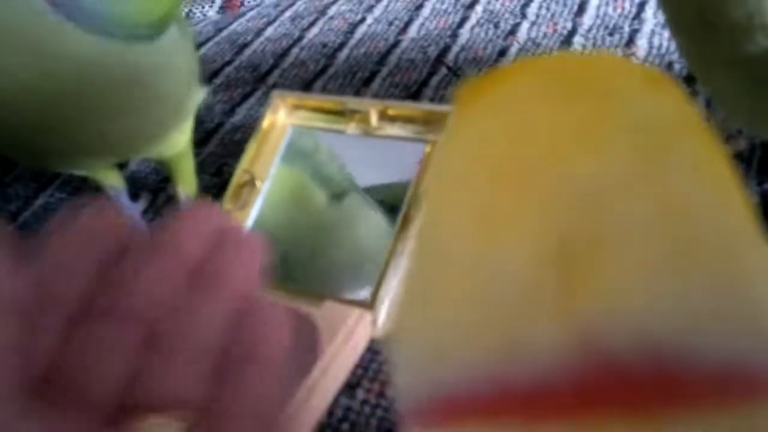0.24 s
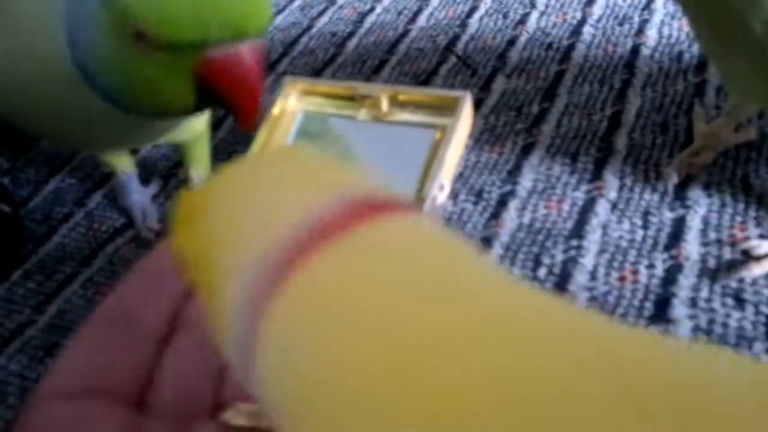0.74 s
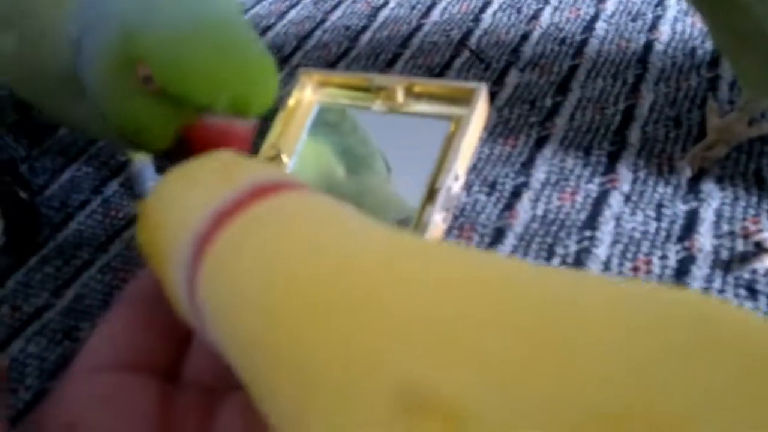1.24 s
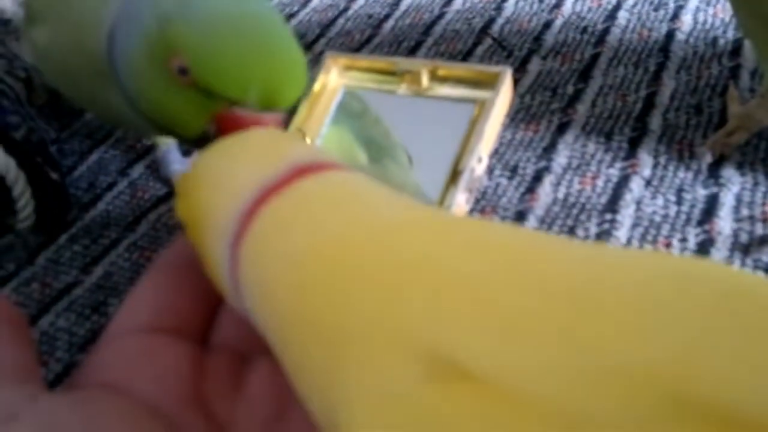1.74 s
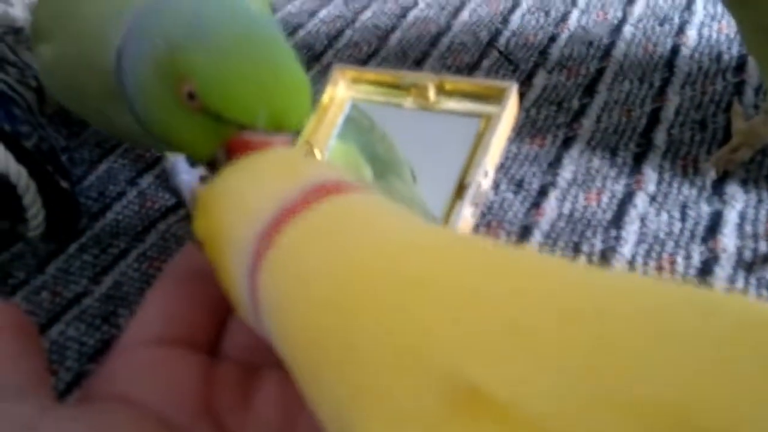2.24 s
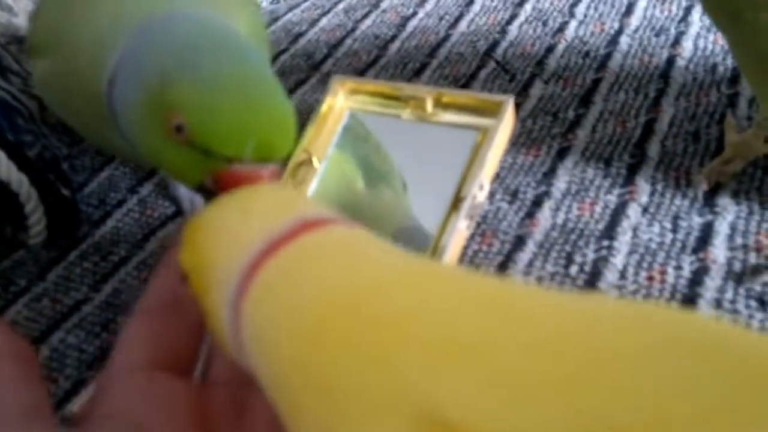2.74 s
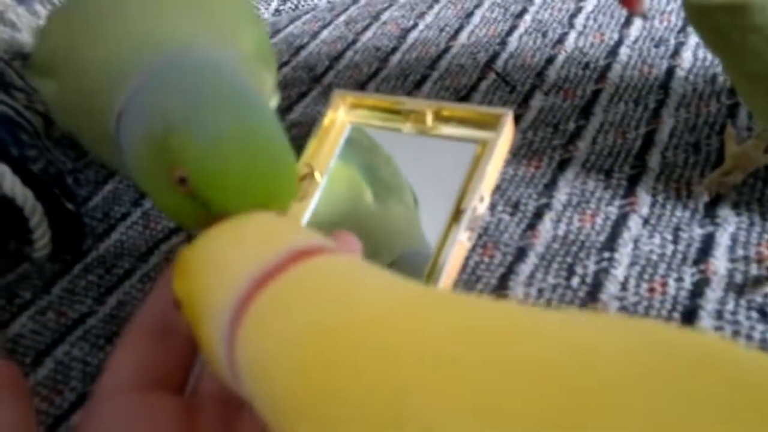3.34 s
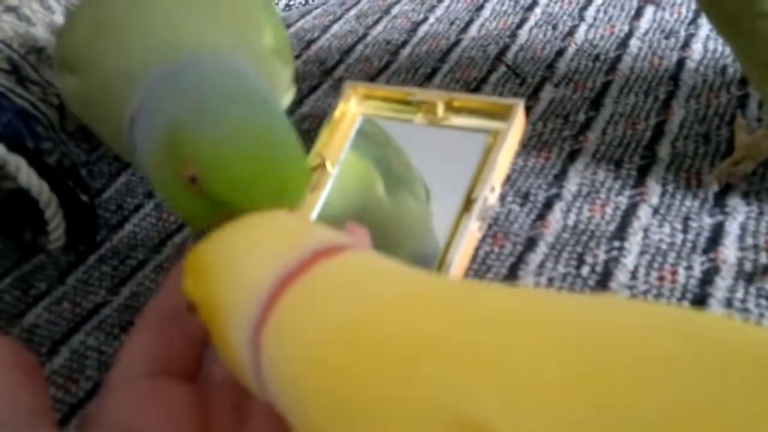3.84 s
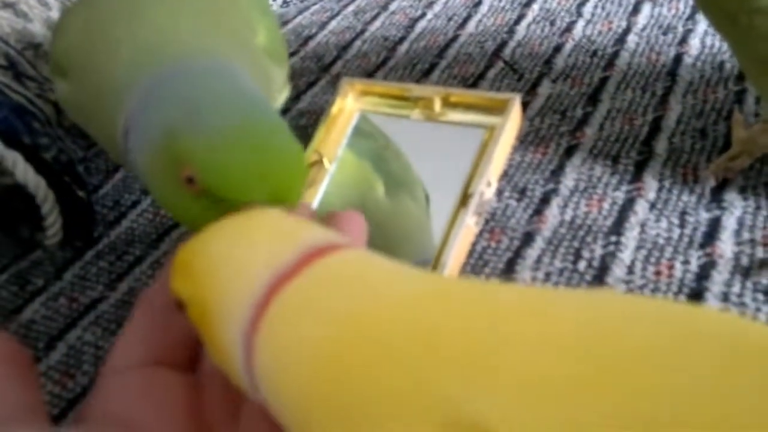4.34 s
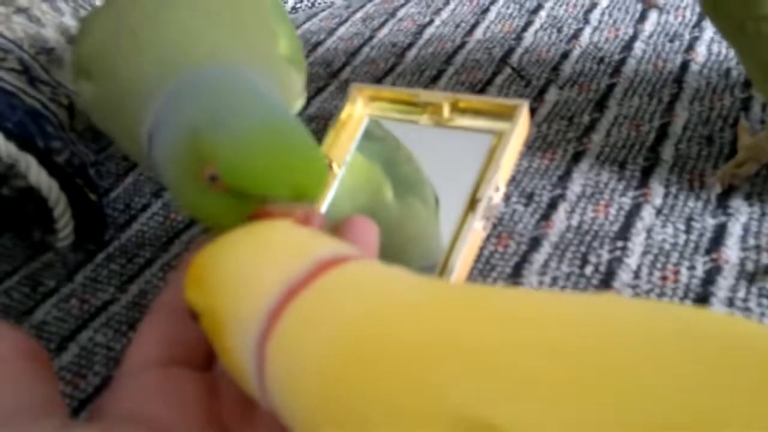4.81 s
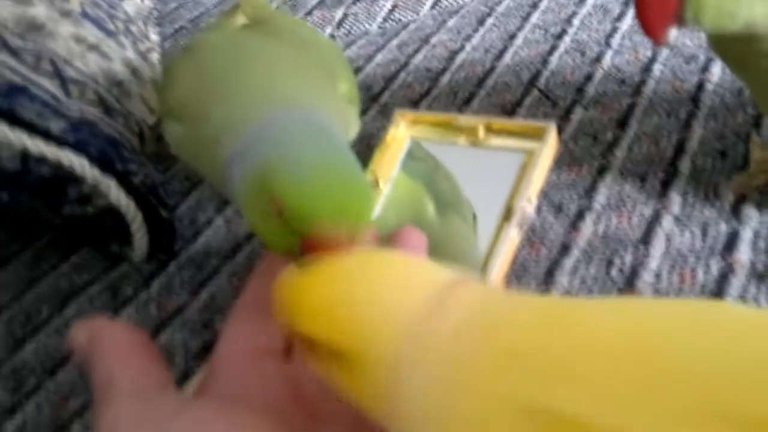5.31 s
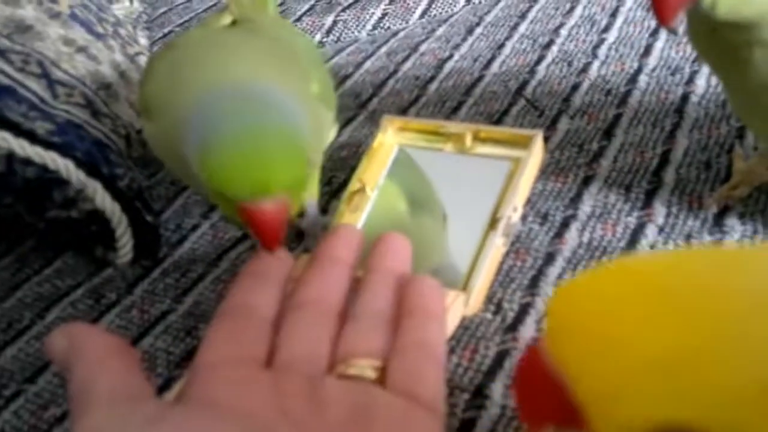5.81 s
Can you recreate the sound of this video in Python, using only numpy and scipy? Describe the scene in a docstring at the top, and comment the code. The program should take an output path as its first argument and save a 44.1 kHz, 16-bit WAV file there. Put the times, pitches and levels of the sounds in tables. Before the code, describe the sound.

Close stereo pickup of a ring-necked parrot on carpet. After about a second of near quiet, barely audible clucks quickly grow into strong, dry, evenly spaced chirps, each one to three tight strokes of rasp and rough whistle. Tiny beak scrapes fall between them. The small furnished room answers with a brief ring. The calls slow slightly, lose their whistle and fade over low rumble and hiss.

```python
"""A ring-necked parrot, close by on a carpet, gives a run of short clucking chirps that swell and fade,
most of them about four a second. Each is a dry rasp: noise spurts ringing chest, windpipe, throat and beak.
One to three rough whistled strokes, noisy sweeping sines, climb in pitch; the last chirps are nearly all rasp.
Beaks tick softly in between (short noise scrapes), with a few chuffs (resonant noise) and faint thin peeps
(wavering sines), one of them a tiny soft chirp. A small room rings briefly over a quiet low rumble and hiss."""
import sys
import numpy as np
from scipy import signal
from scipy.fft import rfft, irfft, next_fast_len
from scipy.io import wavfile

SR = 44100
rng = np.random.default_rng(int(sys.argv[2]) if len(sys.argv) > 2 else 0)


def materialize(psi):
    """Save the field psi as 16-bit PCM at rate SR to the path in sys.argv[1].

    A 1-D psi becomes a single channel; in a 2-D psi each row is a channel.
    """
    bounded = np.clip(np.atleast_2d(psi).T, -1, 1)
    quanta = np.round(bounded * 32767).astype(np.int16)
    wavfile.write(sys.argv[1], SR, quanta)


N = 267334
GRAIN = np.arange(-4096, 4096) / SR  # time axis of one short sound [s], zero at its centre

# All source levels below are taken before the final mix.
LOUD_DB = -29  # rasp level of a chirp at full effort
ATTACK_S, RISE_SHARE = 0.0027, 0.69  # the rasp swells over this time, plus this share of the lead
THROAT_BASE_HZ, THROAT_HZ_PER_DB = 1477, 27  # the throat resonance sinks as the chest takes over
# the chest resonance sinks with effort and as the chest takes over
CHEST_BASE_HZ, CHEST_HZ_PER_DB, CHEST_HZ_PER_CHEST_DB = 657, 12, 5.5
# opening stroke: its rasp eases in ahead of its whistle; its hiss is stronger as the beak opens
OPEN_RISE_S, OPEN_S, OPEN_RASP_DB, OPEN_HISS_DB = 0.0063, 0.0036, -4.5, 9.5
# the tongue snaps as hard as the beak rings, and is heard even through a shut beak
SNAP_DB, SNAP_S, SNAP_LEAST_DB = -2.5, 0.0012, -5
RASP_PAN_DB = -4  # left minus right

# The chirps, one a row: (time of last stroke [s], number of strokes, lead from opening to last stroke [s],
# fall [s], rasp level [dB], chest [dB re rasp], beak [dB re rasp], hiss [dB re rasp],
# whistle level [dB], whistle pitch [Hz], whistle left minus right [dB])
CHIRP_STROKES = [(0.833, "single", 0.0083, 0.0021, -68.5, 17, -20, -27, -49, 2494, 6),
                 (1.174, "single", 0.0045, 0.0077, -61.5, 16, -22, -8, -45.5, 2750, 10.5),
                 (1.360, "single", 0.0092, 0.0022, -48.5, 13, -8, -5, -17.5, 2620, 0.5),
                 (1.624, "double", .024, 0.014, -32, -4, -22, -26, -22, 3232, -2),
                 (1.850, "double", .028, 0.0059, -27.5, -1, -27.5, -29, -12, 2885, -1.5),
                 (2.073, "triple", 0.021, 0.0095, -27, -2, -3, -17, -10.5, 3044, 0.5),
                 (2.315, "triple", 0.025, 0.0067, -27.5, 1.5, -2, -20, -10, 3128, -1),
                 (2.562, "double", 0.014, 0.0064, -27.5, -3, -1, -18.5, -11.5, 2759, 0.5),
                 (2.803, "double", 0.015, 0.0069, -29.5, 6, 3.5, -17, -11.5, 2792, -1),
                 (3.047, "single", 0.013, .011, -27, -6, -3.5, -27, -18, 2670, -1),
                 (3.292, "double", 0.01, 0.007, -26, -11.5, -11.5, -29, -24, 2670, -8),
                 (3.556, "double", .016, .012, -25.5, -5.5, -6.5, -27, -19, 2701, -7),
                 (3.801, "single", 0.018, .016, -28, -5, -3, -33, -14, 2848, -5.5),
                 (4.072, "triple", .016, 0.0084, -27, -10.5, 2.5, -39, -19.5, 2750, -4.5),
                 (4.332, "triple", .018, 0.0071, -27.5, 1.5, 8, -19.5, -16, 3042, -3.5),
                 (4.602, "single", 0.00086, 0.014, -30, -1, 4, -17, -38.5, 3000, 4),
                 (4.901, "single", 0.0016, 0.0078, -25, -2.5, -13, -26.5, -38, 2520, 11),
                 (5.177, "single", 0.0052, 0.012, -39.5, 3, -1.5, -16, -73, 2914, 0),
                 (5.447, "single", .005, 0.01, -51.5, 8.5, 0.5, -9, -68, 2701, 2)]


def chirp_rasps():
    """Source-filter principle: pushes of turbulent air excite body resonances, ending in a tongue snap."""
    out = np.zeros((2, N))
    for s, strokes, lead, fall, db, chest_db, beak_db, hiss_db, *_ in CHIRP_STROKES:
        throat_hz = THROAT_BASE_HZ - THROAT_HZ_PER_DB * chest_db
        effort_db = db - LOUD_DB
        chest_hz = CHEST_BASE_HZ - CHEST_HZ_PER_DB * effort_db - CHEST_HZ_PER_CHEST_DB * chest_db
        pushes = [(s, swell(ATTACK_S + RISE_SHARE * lead, fall), db, hiss_db)]
        if strokes != "single":
            opening = swell(OPEN_RISE_S, OPEN_S)
            pushes.append((s - lead, opening, db + OPEN_RASP_DB, hiss_db + OPEN_HISS_DB))
        for at, push, level_db, edge_db in pushes:
            pair = [rasp(push, level_db, throat_hz, chest_hz, chest_db, beak_db, edge_db,
                         syrinx_db=-2.5, grit_db=6.0, edge=1.8) for _ in range(2)]
            add(out, at, two_ears(*pair, RASP_PAN_DB))
        snap_db = db + max(beak_db, SNAP_LEAST_DB) + SNAP_DB
        snap = rasp(swell(1.3 * SNAP_S, SNAP_S), snap_db, 1500, 700, chest_db=-11, beak_db=-12.5,
                    hiss_db=-25.5, syrinx_db=-6.5, grit_db=5.5, edge=.5)
        add(out, s, snap)
    return out * undb(-2.5)


RASP_TOP_HZ = 7660  # the rasp dies away above this
# The syrinx rasps over a broad band: (centre [Hz], width of one filter pass [Hz])
SYRINX_BAND = (2900, 1700)
# The beak rings above it: (centre [Hz], width of one filter pass [Hz])
BEAK_BAND = (4510, 1600)
# Thin hiss at the beak's edge: (low limit [Hz], high limit [Hz])
HISS_BAND = (8500, 11900)


def rasp(push, db, throat_hz, chest_hz, chest_db, beak_db, hiss_db, syrinx_db, grit_db, edge,
         throat_width_hz=650, chest_width_hz=330):
    """Parallel formants: uneven air spurts excite chest, windpipe, throat, syrinx and beak side by side."""
    grit = undb(grit_db * wobble(450))
    air = push * grit * rng.standard_normal((7, len(GRAIN)))
    hard = push ** edge  # weights the treble towards the hardest part of the push
    parts = [
        (resonate(air[0], chest_hz, chest_width_hz), chest_db - 1),
        (resonate(air[1], .72 * throat_hz, 400), -5),  # the windpipe rings below the throat
        (resonate(air[2], 1.047 * throat_hz, throat_width_hz), -1),
        (resonate(air[3], *SYRINX_BAND), syrinx_db),
        (resonate(air[4] * hard, *BEAK_BAND), beak_db),
        (resonate(air[5], 250, 210), chest_db - 18.0),  # the soft puff underneath
    ]
    body = sum(dose(sound, push, db + rel_db) for sound, rel_db in parts)
    body = signal.sosfilt(signal.butter(3, RASP_TOP_HZ, fs=SR, output="sos"), body)
    hiss = signal.sosfilt(signal.butter(2, HISS_BAND, "band", fs=SR, output="sos"), air[6] * hard)
    return body + dose(hiss, push, db + hiss_db)


def chirp_whistles(second_ratio=1.24, second_db=-12, lag_spread_s=.00005):
    """Two-voice principle: both sides of the syrinx swing at once, the second higher, and beat together."""
    out = np.zeros((2, N))
    for s, half, db, hz, pan_db in bursts():
        push = swell(half, half)
        first = whistle(push, db, hz, jitter=0.073, flutter_db=4.5, glide_hz_per_s=11000)
        second = whistle(push, db + second_db, hz * second_ratio,
                         jitter=.06, flutter_db=-0.5, glide_hz_per_s=8300)
        left, right = place(first, pan_db) + place(second, 4.5)
        # a small chance lag at the right ear, different for each stroke, widens the whistle
        lag = int(round(lag_spread_s * SR * rng.standard_normal()))
        add(out, s, np.array([left, np.roll(right, lag)]))
    return out


WHISTLE_SHARE = 0.56  # half length of the last whistle against the fall of the rasp
# the opening whistle starts alike in all chirps that have one, then weakens as the run goes on
OPEN_DB, OPEN_HZ, OPEN_PAN_DB = -17, 2520, 6  # the pan is added to that of the last stroke
OPEN_FADE_FROM_S, OPEN_FADE_DB_PER_S = 2.5, 1.5
MIDDLE_S = 0.0037  # half length of a middle stroke


def bursts():
    """Pitch stepping: evenly spaced strokes, as (time [s], half length [s], level [dB], pitch [Hz], pan [dB])."""
    for s, strokes, lead, fall, *_, db, hz, pan_db in CHIRP_STROKES:
        yield s, WHISTLE_SHARE * fall, db, hz, pan_db
        if strokes != "single":
            open_db = OPEN_DB - OPEN_FADE_DB_PER_S * max(s - OPEN_FADE_FROM_S, 0)
            yield s - lead, OPEN_S, open_db, OPEN_HZ, pan_db + OPEN_PAN_DB
        if strokes == "triple":
            yield s - lead / 2, MIDDLE_S, db, (OPEN_HZ + hz) / 2, pan_db


def whistle(push, db, hz, jitter, flutter_db, glide_hz_per_s):
    """Frequency and amplitude modulation: a membrane swings with unsteady pitch and strength."""
    pitch = hz * (1 + jitter * wobble(600)) + glide_hz_per_s * GRAIN
    tone = np.sin(2 * np.pi * np.cumsum(pitch) / SR)
    strength = undb(flutter_db * wobble(290))
    return dose(push * strength * tone, push, db)


TICK_CHEST_DB = -2.5
TICK_HISS_DB, TICK_HISS_PER_BEAK_DB = -10, 0.97  # a ringing beak also hisses more
# Beak ticks and nibbles: (time [s], half length before shaping [s], level [dB], beak [dB re level])
BEAK_TICKS = [(0.14, 0.0065, -46.5, -7.5), (1.428, 0.0096, -59.5, -22), (1.562, 0.0032, -42, -24),
              (2.917, 0.015, -47.5, -5.5), (3.179, .011, -46, -8), (3.201, 0.011, -44, -11),
              (3.322, 0.018, -51, 8), (3.45, 0.014, -52.5, -9), (3.482, 0.0098, -41.5, -8),
              (3.745, 0.024, -46, -11), (3.987, 0.03, -49.5, 1.5), (4.01, 0.0095, -48.5, 1.5),
              (4.252, 0.0052, -52.5, -8.5), (4.482, 0.009, -53, -9), (5.499, .008, -68, 5),
              (5.822, 0.016, -49, 5.5)]


def ticks():
    """Friction noise: short gritty scrapes of the beaks excite the same resonator bank."""
    out = np.zeros(N)
    for s, half, db, beak_db in BEAK_TICKS:
        hiss_db = TICK_HISS_DB + TICK_HISS_PER_BEAK_DB * beak_db
        push = swell(0.48 * half, 0.85 * half)
        scrape = rasp(push, db, 2100, 800, TICK_CHEST_DB, beak_db, hiss_db,
                      syrinx_db=-3.5, grit_db=4.0, edge=.4)
        add(out, s, scrape)
    return out


CHUFF_WIDTH_HZ = 750  # of one filter pass
# Chuffs of resonant noise; the strongest, at 4.363 s, is probably the room answering a chirp:
# (time [s], half length [s], level [dB], centre [Hz])
CHUFF_EVENTS = [(0.135, 0.021, -54, 1820), (0.279, 0.013, -53, 1890), (0.664, 0.014, -51, 1910),
                (1.502, 0.018, -65.5, 1560), (1.792, 0.009, -51, 1353), (4.363, 0.016, -35.5, 2000),
                (5.766, 0.017, -49.5, 1340)]
# Faint thin peeps, the one at 1.027 s a tiny soft chirp:
# (time [s], half length [s], level before harmonic weights [dB], pitch [Hz])
PEEP_EVENTS = [(0.006, 0.0082, -36, 2611), (0.1, 0.019, -61, 2540), (1.027, .003, -65.5, 2450)]


def chuffs_and_peeps():
    """Noise and tone excitation: chuffs are resonant air noise, peeps a sine with a weak octave."""
    out = np.zeros(N)
    for s, half, db, hz in CHUFF_EVENTS:
        push = swell(half, half)
        air = push * rng.standard_normal(len(GRAIN))
        add(out, s, dose(resonate(air, hz, CHUFF_WIDTH_HZ), push, db))
    for s, half, db, hz in PEEP_EVENTS:
        for multiple, rel_db in ((1, -0.5), (2, -9)):
            peep = whistle(swell(half, half), db + rel_db, multiple * hz,
                           jitter=0.026, flutter_db=1.0, glide_hz_per_s=-900)
            add(out, s, peep)
    return out


# Shading of the right ear from the beak: (frequency [Hz], gain of the right ear's rasps and ticks [dB])
EAR_SHADE = [(200, -8.5), (700, -6.5), (1200, 0.5), (1800, -1), (3000, 2), (4000, 0), (5000, -16),
             (8000, -37), (14000, -16.5)]


def shade(sound):
    """Acoustic shadowing: the ear turned from the beak receives a differently coloured sound."""
    left, right = sound
    return np.array([left, colour(right, EAR_SHADE)])


# Near echoes off mirror, hand and carpet: (delay at left ear [s], delay at right ear [s], gain [dB])
NEAR_SURFACES = [(.0014, .0019, -18), (.0029, .0037, -17.5), (.0054, .0046, -16)]


def near_echoes(birds):
    """Comb filtering: delayed copies from small near surfaces colour each ear differently."""
    out = birds.copy()
    for left_s, right_s, db in NEAR_SURFACES:
        for ear, lag_s in enumerate((left_s, right_s)):
            lag = int(lag_s * SR)
            out[ear, lag:] += undb(db) * birds[ear, :N - lag]
    return out


# Throw of the sound into the room as the bird turns its head: (time [s], body gain [dB], bright gain [dB])
HEAD_TURN = [(1.36, -3.5, -4), (1.6, -1.5, -3.5), (1.9, -5, 6.5), (2.7, -2, 0.5), (3.1, -3, 8),
             (3.8, 1, -1), (4.35, -6, -7), (4.6, -4.5, 2), (4.9, -9, -4), (5.201, -11.5, -16)]


def thrown(x):
    """Directivity: the body and the bright part sent to the room each vary with the turn of the head."""
    s, body_db, bright_db = np.transpose(HEAD_TURN)
    t = np.arange(N) / SR
    body = signal.sosfiltfilt(signal.butter(4, 2550, fs=SR, output="sos"), x)
    bright = x - body
    return body * undb(np.interp(t, s, body_db)) + bright * undb(np.interp(t, s, bright_db))


# Colour of the room's ring: (frequency [Hz], gain [dB])
ROOM_COLOUR = [(150, -27), (600, -12), (1100, -1.5), (1800, 6), (2300, 8), (2900, -11.5), (3800, -6),
               (5000, -8), (6500, -22), (12000, -17)]


def sent_to_room(rasps, whistles):
    """Radiation: whistles beam forward while the rasp spreads more freely, and the room colours both."""
    radiated = (undb(0.5) * rasps + undb(-3) * whistles).mean(axis=0)
    return colour(thrown(radiated), ROOM_COLOUR)


def reflections(x, buildup_s, t60_s):
    """Diffuse reverberation: dense echoes build up and decay exponentially, different at each ear."""
    t = np.arange(SR * 3 // 4) / SR
    decay = np.exp(-np.log(1000) * t / t60_s)
    buildup = 1 - np.exp(-(t / buildup_s) ** 2)
    tail = rng.standard_normal((2, len(t))) * decay * buildup
    tail /= np.sqrt(np.sum(tail ** 2, axis=1, keepdims=True))
    return signal.fftconvolve(x[None], tail, axes=1)[:, :N]


RUMBLE_SWAY_DB, RUMBLE_SWAY_HZ = 4, 35
# Spectral shape of the quiet background: (frequency [Hz], relative density [dB per Hz])
FLOOR_SHAPE = [(20, -10), (70, -5), (110, -15.5), (200, -18), (330, -21.5), (640, -23), (1000, -25.5),
               (1900, -28.5), (3500, -34), (9500, -37.5), (12000, -46), (15500, -52.5)]
# Low rumble: (time [s], level before the sway [dB])
RUMBLE_LEVEL = [(0, -59.5), (.9, -69.5), (1.8, -67.5), (2.7, -72.5), (3.8, -64.5), (4.1, -77), (4.8, -65),
                (6.06, -69.5)]


def background():
    """Filtered noise: partly shared by both ears, split into a lumpy rumble and a faint smooth hiss."""
    noise = colour(rng.standard_normal((2, N)) + 0.22 * rng.standard_normal(N), FLOOR_SHAPE)
    low = signal.sosfiltfilt(signal.butter(2, 260, fs=SR, output="sos"), noise)
    rumble_db = np.interp(np.arange(N) / SR, *np.transpose(RUMBLE_LEVEL))
    rumble_db = rumble_db + RUMBLE_SWAY_DB * drift(RUMBLE_SWAY_HZ)
    hiss_db = -73.5 + 1.0 * drift(2.1)
    return unit(low) * undb(rumble_db) + unit(noise - low) * undb(hiss_db)


def drift(rate_hz):
    """Slow random modulation: chance values of spread near 1 joined by straight lines."""
    t = np.arange(N) / SR
    return np.interp(t * rate_hz, np.arange(400), rng.standard_normal(400))


def wobble(rate_hz):
    """Band-limited modulation: smooth chance of spread 1 over the length of one grain."""
    lowpass = signal.butter(2, rate_hz, fs=SR, output="sos")
    return unit(signal.sosfilt(lowpass, rng.standard_normal(len(GRAIN))))


def swell(rise, fall):
    """Amplitude envelope: a push of air opens abruptly and dies away as a bell curve."""
    opening = np.abs(GRAIN / rise) ** 3
    closing = (GRAIN / fall) ** 2
    return np.exp(-.5 * np.where(GRAIN < 0, opening, closing))


def resonate(x, hz, width):
    """Resonance: the same peak filter applied twice, for steep skirts."""
    b, a = signal.iirpeak(hz, hz / width, fs=SR)
    once = signal.lfilter(b, a, x)
    return signal.lfilter(b, a, once)


def colour(x, points):
    """Minimum-phase filtering by a (frequency [Hz], gain [dB]) curve: causal, so attacks stay sharp."""
    size = 2 * next_fast_len(x.shape[-1] // 2 + 4096)
    hz, db = np.transpose(points)
    bins_hz = np.fft.rfftfreq(size, 1 / SR) + 1  # the offset keeps the logarithm finite
    log_gain = np.log(undb(np.interp(np.log(bins_hz), np.log(hz), db)))
    cepstrum = irfft(log_gain)
    # folding the cepstrum to positive times makes the response causal
    cepstrum[1:size // 2] *= 2
    cepstrum[size // 2 + 1:] = 0
    response = np.exp(rfft(cepstrum))
    return irfft(rfft(x, size) * response)[..., :x.shape[-1]]


def two_ears(first, second, pan_db, apart=0.96):
    """Partial coherence: so close to the beak each ear hears a partly different sound."""
    share = np.clip(apart, 0, 1)
    other = np.sqrt(1 - share ** 2) * first + share * second
    return place(np.array([first, other]), pan_db)


def place(x, pan_db):
    """Interaural level difference: half the left-minus-right decibels go to each ear."""
    return x * undb(np.array([[pan_db], [-pan_db]]) / 2)


def dose(x, push, db):
    """Energy scaling: give a sound the energy of this push at this level."""
    return unit(x) * np.sqrt(np.mean(push ** 2)) * undb(db)


def unit(x):
    """Normalization: scale to a root-mean-square of 1."""
    return x / np.sqrt(np.mean(x ** 2))


def undb(db):
    """Logarithmic level: decibels to amplitude gain."""
    return 10 ** (np.asarray(db) / 20)


def add(track, s, sound):
    """Superposition: mix a grain into the track, centred on time s."""
    at = int(s * SR) + np.arange(len(GRAIN)) - len(GRAIN) // 2
    inside = (at >= 0) & (at < N)
    track[..., at[inside]] += sound[..., inside]


def scene():
    """Superposition of direct sound, near echoes, room reverberation, chuffs, peeps and background."""
    rasps = shade(chirp_rasps() + ticks())
    whistles = chirp_whistles()
    birds = rasps + whistles
    extras = chuffs_and_peeps()
    scatter = np.array([reflections(side, 0.0012, 0.061)[0] for side in birds])
    sent = sent_to_room(rasps, whistles)
    # carpet and furnishings soak up the treble first, so the ring sinks as it fades
    early = reflections(sent, 0.02, 0.24)
    late = reflections(resonate(sent, 2100, 1500), 0.073, 0.38)
    close = undb(-3.0) * near_echoes(birds) + undb(-8.5) * scatter
    ring = undb(-13.0) * early + undb(-24.5) * late
    extras_room = reflections(colour(extras, [(2600, 0.5), (5000, -14)]), .008, 0.23)
    return close + ring + undb(-4.5) * extras + undb(-3) * extras_room + background()


TOP_HZ = 15700


def record(dry):
    """Band limiting: a steep elliptic low-pass removes the extreme treble."""
    return signal.sosfilt(signal.ellip(10, .2, 80, TOP_HZ, fs=SR, output="sos"), dry)


dry = scene()
out = record(dry)
materialize(out)
```